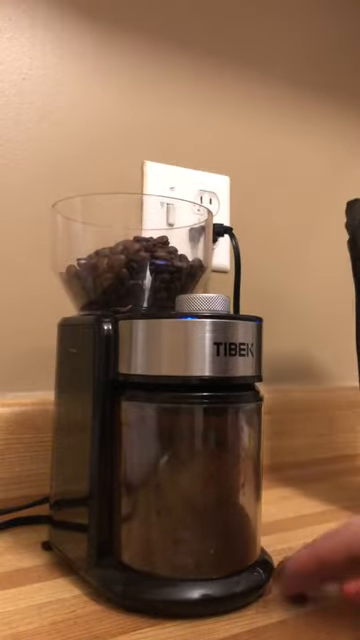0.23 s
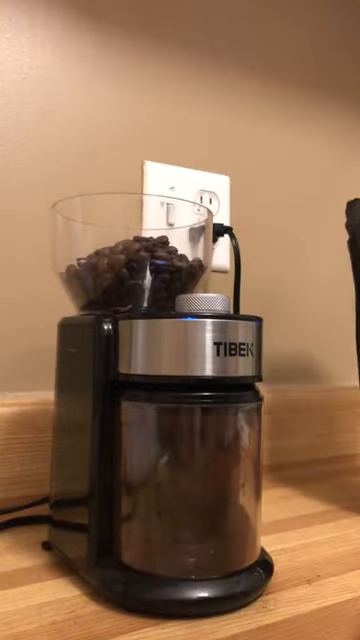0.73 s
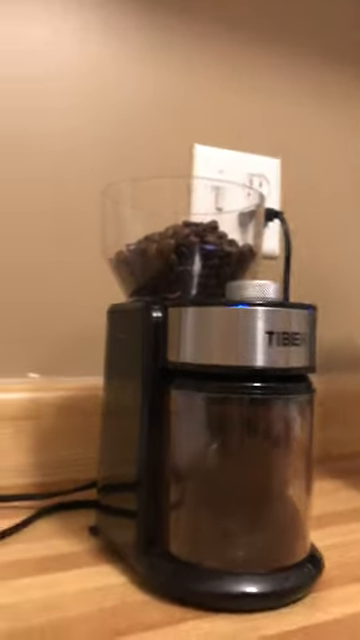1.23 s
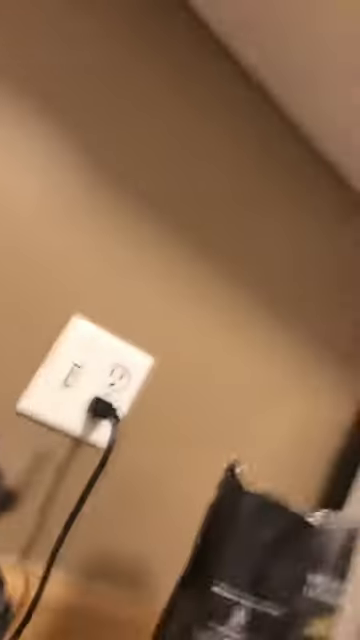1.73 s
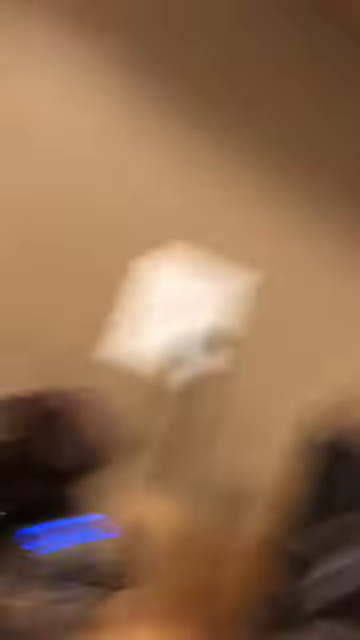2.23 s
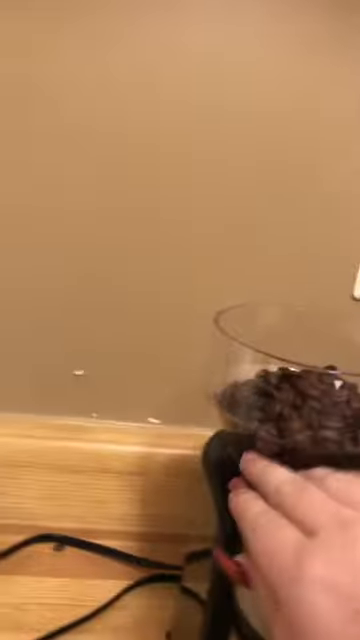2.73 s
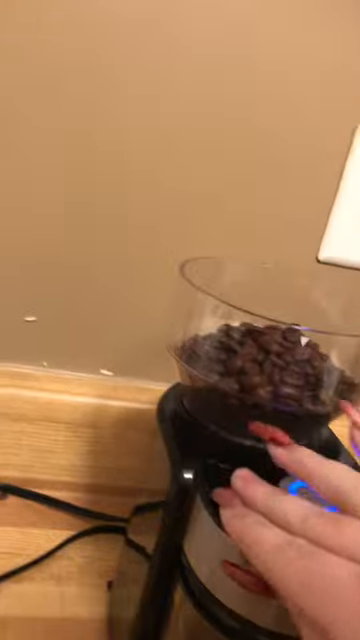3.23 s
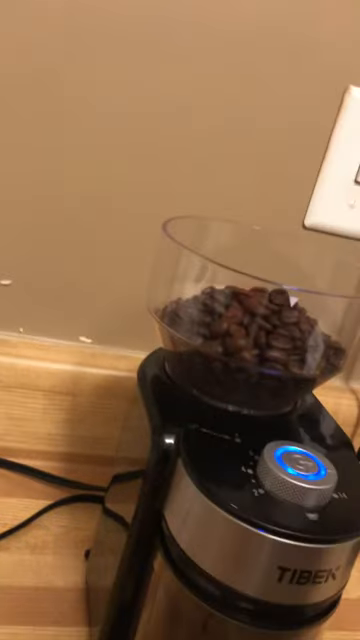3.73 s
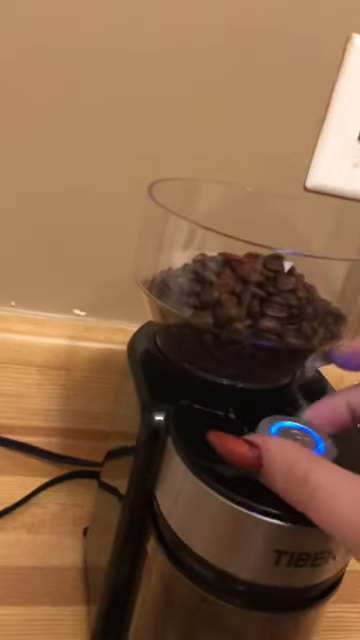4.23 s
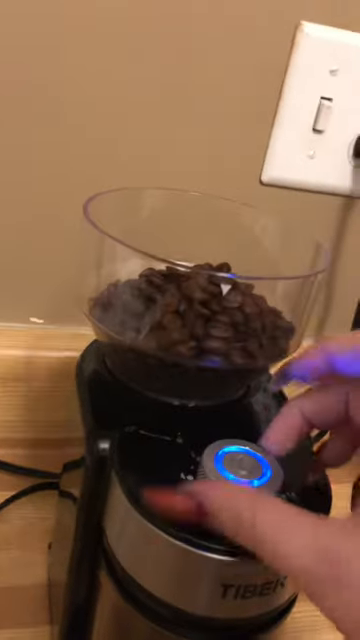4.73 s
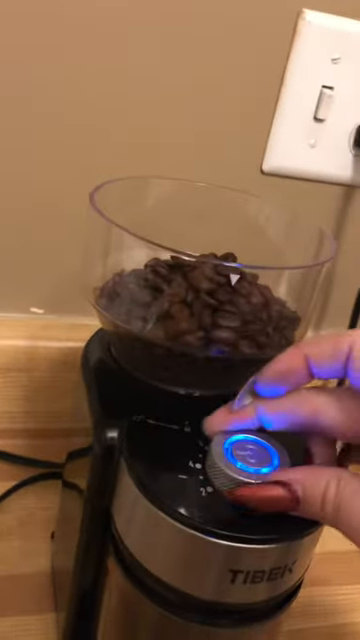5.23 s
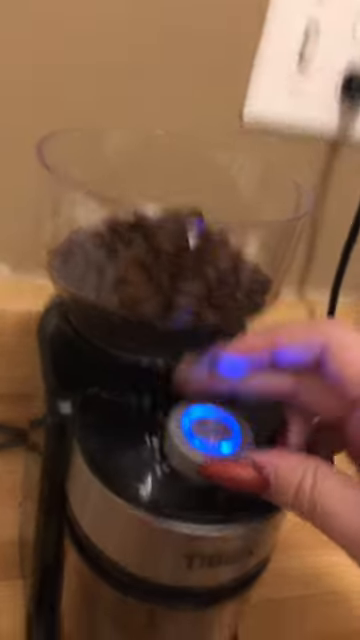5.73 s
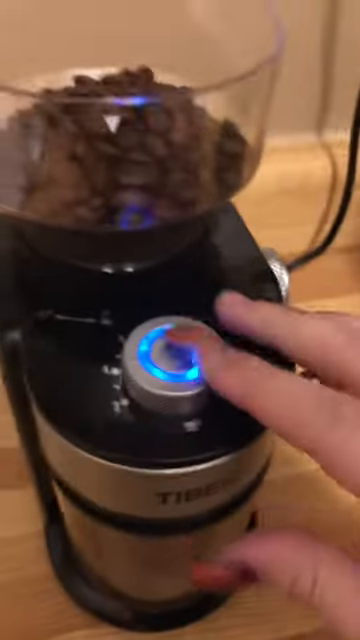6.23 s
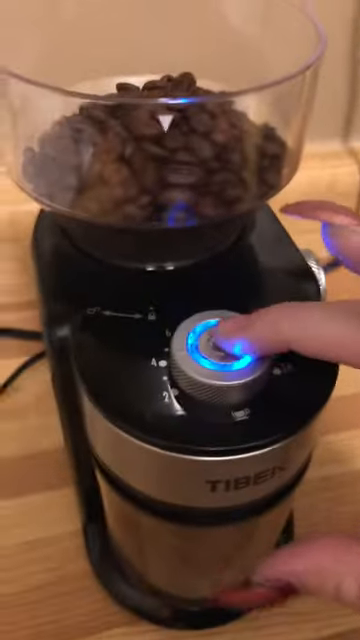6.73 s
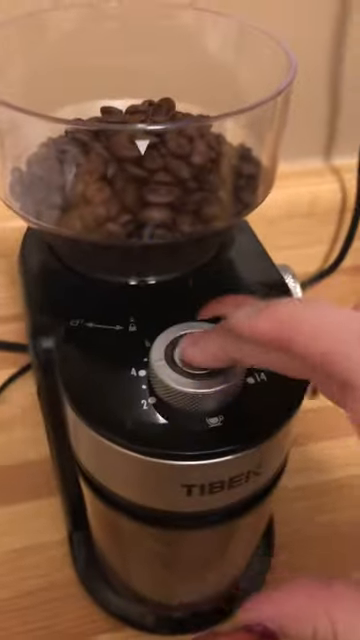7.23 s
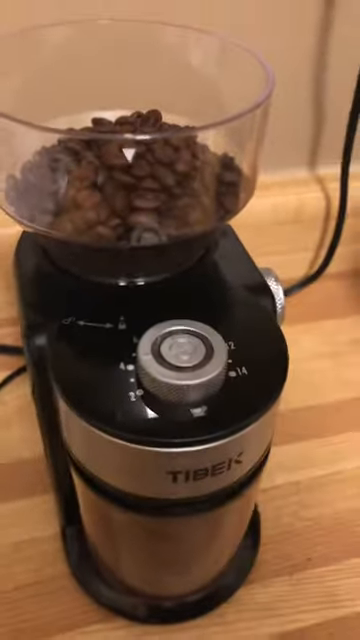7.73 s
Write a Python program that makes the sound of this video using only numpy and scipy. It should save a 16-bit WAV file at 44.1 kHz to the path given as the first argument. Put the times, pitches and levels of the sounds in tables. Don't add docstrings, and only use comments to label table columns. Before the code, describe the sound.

Soft rubbing and handling, sharp nail taps on hard plastic, a knob clicking rapidly forward and back, then more slowly, and finally a firm button press.

```python
import sys
import numpy as np
from scipy import signal
from scipy.fft import rfft, irfft, next_fast_len
from scipy.io import wavfile
from scipy.ndimage import map_coordinates

SR = 44100
rng = np.random.default_rng(int(sys.argv[2]) if len(sys.argv) > 2 else 0)


def convert_level_to_amplitude(level_db):
    exponent = np.asarray(level_db, float) / 20
    return 10 ** exponent


def dump_mix(stems):
    frames = np.atleast_2d(stems).T
    limited = np.clip(frames, -1, 1)
    pcm = np.round(limited * 32767).astype(np.int16)
    wavfile.write(sys.argv[1], SR, pcm)


N = 352359
SIZE = 16384
GRID = np.fft.rfftfreq(SIZE, 1 / SR)


def unit(x):
    return x / np.sqrt(np.mean(x ** 2) + 1e-20)


def along(points, hz):
    f, v = np.transpose(points)
    return np.interp(np.log(hz + 1), np.log(f + 1), v)


def curves(rows):
    time_s, *columns = np.transpose(rows)
    t = np.arange(N) / SR
    return [np.interp(t, time_s, column, -140, -140) for column in columns]


def wobble(rate):
    knots = rng.standard_normal(int(N * rate / SR) + 4)
    return map_coordinates(knots, [np.arange(N) * rate / SR])


def noise(spectrum, grain_db=0):
    raw = rng.standard_normal(N) * convert_level_to_amplitude(grain_db * wobble(400))
    size = next_fast_len(N + 8192)
    gain = convert_level_to_amplitude(along(spectrum, np.fft.rfftfreq(size, 1 / SR)))
    return unit(irfft(rfft(raw, size) * gain, size)[:N])


def ring(start_s, pitch_hz, level_db, t60_s, rise_s):
    t = np.maximum(np.arange(N) / SR - start_s, 0)
    envelope = convert_level_to_amplitude(level_db - 60 * t / t60_s) * (1 - np.exp(-t / rise_s))
    return envelope * np.sin(2 * np.pi * pitch_hz * t)


def resonances(modes):
    power = 0
    for centre, width, db in modes:
        bandpass = (GRID * width) ** 2 / ((centre * centre - GRID ** 2) ** 2 + (GRID * width) ** 2)
        power = power + (convert_level_to_amplitude(db) * bandpass) ** 2
    return np.sqrt(power)


def causal(gain):
    cepstrum = irfft(np.log(gain + 1e-7))
    cepstrum[..., 1:SIZE // 2] *= 2
    cepstrum[..., SIZE // 2 + 1:] = 0
    return np.exp(rfft(cepstrum))


# pitch_hz, t60_s
WALLS = [(500, .3), (2000, 0.27), (5500, 0.2), (15000, 0.17)]


def reverberation(raw):
    hz, frames_s, z = signal.stft(raw, SR, nperseg=256)
    decay = convert_level_to_amplitude(-60 * frames_s / along(WALLS, hz)[:, None])
    return signal.istft(z * decay, SR, nperseg=256)[1][:, :SIZE]


def strikes(times, levels_db, colours, alike, spike_db, hold, t60, ring_db, ring_t60, room_db):
    t = np.arange(SIZE) / SR
    chatter = convert_level_to_amplitude(-60 * np.maximum(t - hold, 0) / t60) + convert_level_to_amplitude(ring_db - 60 * t / ring_t60)
    raw = rng.standard_normal((len(times) + 1, 2, SIZE))
    alike = np.clip(alike, 0, 1)
    raw = alike * raw[:1] + np.sqrt(1 - alike ** 2) * raw[1:]
    blow = raw[:, 0] * chatter + convert_level_to_amplitude(spike_db) * (t == 0)
    walls = reverberation(raw[:, 1]) * (1 - np.exp(-t / 0.003))
    power = 0
    for db, colour in zip(levels_db, colours):
        strength = np.mean(abs(rfft(blow) * colour) ** 2, axis=-1)
        power = power + (convert_level_to_amplitude(2 * db) / strength)[:, None] * colour ** 2
    sound = blow + convert_level_to_amplitude(room_db) * walls
    hits = irfft(rfft(sound) * causal(np.sqrt(power)))
    out = np.zeros(N + SIZE)
    for start_s, hit in zip(times, hits):
        out[round(start_s * SR):][:SIZE] += hit
    return out[:N]


# pitch_hz, level_db (per Hz)
ROOM_TONE = [(59, -31), (100, 2.5), (129, -2.5), (198, -10.5), (368, -3.5), (922, -18.5), (1380, -11.5),
             (2860, -19.5), (4030, -17.5), (15100, -27), (16500, -42.5)]


def kitchen():
    phase = 2 * np.pi * 119.8 * np.arange(N) / SR + 0.5 * wobble(14)
    hum = convert_level_to_amplitude(-67 + 2.5 * wobble(9)) * np.sin(phase)
    return hum + convert_level_to_amplitude(-66.5 + 0.6 * wobble(1.9)) * noise(ROOM_TONE)


# time_s, creak_db, rumble_db
GRIP_LEVELS = [(0.0, -67, -74), (0.38, -62, -70), (0.66, -66.5, -70), (0.87, -67, -68), (0.93, -64, -77),
               (1.0, -59, -66), (1.24, -67, -69), (1.33, -67, -76), (1.51, -66.5, -71), (1.67, -61, -51),
               (1.8, -66, -71), (2.16, -60.5, -65), (2.38, -67, -72), (2.8, -64, -64), (2.87, -69.5, -69),
               (3.22, -69, -74), (3.36, -63, -50.5), (3.49, -61.5, -63.5), (3.63, -64, -70.5),
               (3.76, -67, -66), (4.09, -66, -69), (4.18, -66, -60), (4.25, -63.5, -64), (4.38, -58.5, -54),
               (4.63, -70, -68), (4.72, -76, -52), (4.85, -61, -72.5), (5.05, -57, -69), (5.23, -65, -68),
               (5.5, -63.5, -66), (5.56, -69, -74), (5.96, -68, -67), (6.27, -69.5, -76),
               (6.34, -66.5, -68.5), (6.79, -66.5, -69), (6.87, -63, -59), (7.17, -66.5, -74),
               (7.25, -63.5, -52.5), (7.43, -70, -73), (7.56, -70.5, -75), (7.63, -67, -52),
               (7.79, -63.5, -35.5), (7.99, -69.5, -67)]
# start_s, level_db (peak), pitch_hz, t60_s
CASE_THUMPS = [(0.899, -47, 222, 0.14), (0.98, -41.5, 221, 0.13), (1.031, -48, 142, 0.12),
               (1.129, -38, 172, 0.05), (1.658, -46, 61.4, 0.18), (1.999, -46.5, 214, 0.11),
               (3.322, -45, 128, 0.15), (6.911, -47.5, 287, 0.15), (7.229, -40, 299, 0.13),
               (7.653, -27, 99, 0.14), (7.762, -19.5, 73.6, 0.11)]
# pitch_hz, level_db (per Hz)
CREAK_COLOUR = [(76, -21), (130, 3.5), (335, 1), (518, -3.5), (735, -9.5), (1000, -13), (1300, -41.5),
                (2200, -120)]
RUMBLE_COLOUR = [(13, -43), (22, -8), (43, -1), (59, 2), (86, -9.5), (110, 2), (140, -26.5), (240, -120)]


def grip():
    creak_db, rumble_db = curves(GRIP_LEVELS)
    out = convert_level_to_amplitude(creak_db) * unit(convert_level_to_amplitude(1.5 * wobble(30)) * noise(CREAK_COLOUR))
    out += convert_level_to_amplitude(rumble_db) * unit(convert_level_to_amplitude(wobble(6.2)) * noise(RUMBLE_COLOUR))
    for start_s, level_db, pitch_hz, t60_s in CASE_THUMPS:
        out += ring(start_s, pitch_hz, level_db + 1, t60_s, rise_s=0.0053)
    return out


# time_s, rasp_db, hiss_db, scuff_db
STROKES = [
    [(0.05, -67, -72, -75), (0.116, -59.5, -66, -64), (0.25, -55, -59.5, -65.5), (0.46, -50.5, -53.5, -67),
     (0.49, -58, -64.5, -62), (0.74, -62.5, -71.5, -64), (0.76, -65, -68, -76), (0.814, -68, -79, -67),
     (0.832, -68, -66, -77), (0.85, -67, -76, -65)],
    [(1.05, -69, -75, -62), (1.062, -66, -73, -72), (1.136, -69, -76, -60), (1.174, -62.5, -71, -74),
     (1.29, -83, -87, -71), (1.346, -69, -71, -79), (1.45, -84, -81, -66)],
    [(1.48, -75, -85, -58), (1.516, -75, -92, -62), (1.57, -61, -85, -54.5), (1.678, -69, -73, -65.5),
     (1.786, -73, -94, -61), (1.894, -59.5, -52.5, -71), (1.932, -55.5, -48.5, -66), (2.112, -78, -73, -63),
     (2.162, -53, -55, -54.5), (2.3, -102, -98, -75)],
    [(2.78, -49.5, -63, -67), (2.804, -60, -69, -77), (2.848, -62, -64, -66), (2.924, -64.5, -63, -71),
     (3.154, -71, -70, -90), (3.194, -65.5, -62, -72), (3.29, -87, -67, -86), (3.3, -70, -62, -69)],
    [(4.44, -46, -48, -51), (4.472, -60.5, -65, -55), (4.504, -46, -56.5, -60), (4.56, -85, -73, -69)],
    [(4.64, -77, -80, -82), (4.664, -77, -81, -71), (4.716, -84, -61, -84), (4.76, -84, -89, -82)],
    [(5.92, -92, -79, -84), (5.982, -61.5, -64, -75), (6.078, -68.5, -65, -81), (6.116, -55, -57, -73),
     (6.15, -79, -85, -84)],
    [(6.385, -53, -53, -57), (6.427, -62, -43.5, -78), (6.435, -50, -47, -74), (6.46, -70, -76, -65)],
    [(6.77, -46.5, -62, -70), (6.786, -51, -64, -68), (6.802, -62, -62, -69), (6.82, -75, -92, -72)],
    [(7.45, -86, -79, -78), (7.52, -65.5, -75, -79), (7.642, -63.5, -66.5, -62), (7.73, -59.5, -56, -78),
     (7.75, -53.5, -57.5, -62), (7.814, -82, -91, -59), (7.876, -102, -65, -70), (7.95, -94, -91, -87)],
]
# pitch_hz, level_db (per Hz)
RASP_COLOUR = [(290, -31.5), (500, -9.5), (1340, -2.5), (1610, -1), (2320, -2.5), (2480, -1.5),
               (3060, -0.5), (7000, -11), (9100, -34.5), (15400, -120)]
HISS_COLOUR = [(2350, -43.5), (4000, -7), (4600, -7.5), (6590, -5.5), (10800, -10), (14800, -13),
               (16000, -22.5)]
SCUFF_COLOUR = [(150, -25), (300, 2), (550, 2.5), (1000, -4.5), (1500, -26.5)]


def rubbing():
    rasp = noise(RASP_COLOUR, grain_db=2)
    hiss = noise(HISS_COLOUR, grain_db=2)
    scuff = noise(SCUFF_COLOUR, grain_db=3.5)
    out = np.zeros(N)
    for stroke in STROKES:
        rasp_db, hiss_db, scuff_db = curves(stroke)
        out += convert_level_to_amplitude(rasp_db) * rasp + convert_level_to_amplitude(hiss_db) * hiss + convert_level_to_amplitude(scuff_db - 1) * scuff
    return out


# start_s, pitch_hz, level_db, t60_s, rise_s
STEEL_RINGS = [
    (7.021, 732, -33.5, .19, .005),
    (7.021, 775, -30, .19, .005),
    (7.021, 3774, -40, .07, .001),
    (7.021, 5300, -44, .05, .001),
    (.885, 2585, -54, .13, .03),
    (7.350, 2565, -47, .11, .03),
]


def springs():
    return sum(ring(*row) for row in STEEL_RINGS)


# start_s, level_db (peak), knock_db, body_db, edge_db, pitch_hz (of the spot)
CONTACTS = [(0.2234, -42, -63, -51, -58, 3270), (0.4554, -46, -64, -57, -53, 1660),
            (0.8295, -49, -62, -70, -61, 5170), (0.9866, -45, -46, -45, -67, 3720),
            (1.0014, -48, -63, -56, -70, 2750), (1.6523, -43, -67, -67, -57, 3710),
            (2.169, -31, -53, -56, -75, 3970), (2.591, -12, -60, -40.5, -25, 5200),
            (2.6312, -15.5, -64, -52, -29.5, 5350), (2.7145, -37, -63, -50, -50, 5100),
            (2.7265, -13, -55, -32, -35, 4560), (2.779, -32, -68, -51, -61, 3680),
            (2.8324, -44, -67, -60, -71, 3920), (2.8914, -40, -62, -62, -49, 4800),
            (3.3144, -23, -52, -46, -45, 4570), (3.3216, -25.5, -39, -40.5, -29, 6750),
            (3.4337, -14.5, -38, -30, -15.5, 3950), (3.4521, -24, -37, -33.5, -39, 4700),
            (3.5267, -22.5, -50, -37, -33.5, 4120), (3.5869, -30.5, -54, -42, -34.5, 5100),
            (3.616, -31, -53, -41, -40, 3670), (3.703, -33, -62, -49, -39, 5920),
            (3.715, -21, -40, -32.5, -28, 3590), (3.773, -36, -62, -50, -44, 4340),
            (3.8353, -16.5, -38.5, -35, -31, 3000), (3.9282, -23, -45, -39, -30.5, 5700),
            (3.9614, -32, -48, -46.5, -49, 2930), (3.991, -31, -53, -47, -43.5, 3320),
            (4.0026, -27.5, -48, -42.5, -54.5, 2410), (4.02, -34, -59, -51, -46.5, 3670),
            (4.0788, -30, -52, -46.5, -60.5, 2980), (4.122, -49, -51, -51.5, -47, 4670),
            (4.4346, -20, -35.5, -38, -52.5, 1600), (4.4757, -36.5, -45, -43.5, -54, 3660),
            (4.5051, -27, -41, -44.5, -54.5, 1400), (4.656, -46, -60, -65, -67.5, 4470),
            (4.7142, -53, -62, -58, -55, 1530), (5.654, -39, -64, -48, -68, 2130),
            (5.6694, -33, -56, -43.5, -66, 1620), (5.6939, -42, -52, -53.5, -69, 1400),
            (5.8287, -19.5, -73, -37.5, -31.5, 6630), (6.0845, -39, -69, -68, -58, 4360),
            (6.1105, -39, -71, -57.5, -64, 3980), (6.2677, -22, -49, -38.5, -43, 7000),
            (6.377, -25.5, -52, -41, -42, 3980), (6.4338, -26, -62, -51, -51, 4480),
            (6.569, -36, -60, -47.5, -55.5, 2100), (6.5985, -25, -61, -46, -37, 4200),
            (6.6407, -22.5, -48, -41.5, -37, 2100), (6.7622, -32, -69, -54, -55, 4960),
            (6.7784, -47, -59, -51, -68.5, 2100), (6.8474, -52, -39, -39.5, -66.5, 1470),
            (6.9064, -8, -20.5, -26.5, -32, 1480), (6.9753, -31, -57, -50, -51, 2360),
            (7.0218, -20, -32, -39, -35, 5300), (7.0724, -60.5, -49, -56.5, -75, 2090),
            (7.1804, -62.5, -54, -63, -76.5, 1870), (7.226, -23, -28.5, -33.5, -29.5, 1560),
            (7.2391, -30, -32, -30, -55, 1860), (7.2973, -36.5, -59, -66, -65, 1900),
            (4.182, -38.5, -73, -46, -67.5, 2230)]
# pitch_hz, width_hz, level_db
SHELL_MODES = [
    [(400, 300, 0), (730, 290, 6)],
    [(1457, 770, 3), (2100, 270, 5), (3240, 700, -1)],
    [(3700, 980, 1.5), (5100, 590, 6), (7340, 1620, 1.5)],
    [(8780, 1900, 4.5), (12000, 1300, 4.5), (14260, 4900, 0.5)],
]


def taps():
    start_s, peak_db, knock_db, body_db, edge_db, spot_hz = np.transpose(CONTACTS)
    middle_db = peak_db + 7.5
    spot_db = np.where(spot_hz < 3500, body_db + 22.5, middle_db)
    levels = [knock_db + 15.5, body_db + 18.5, middle_db, edge_db + 19, spot_db]
    colours = [resonances(modes) for modes in SHELL_MODES]
    spot = spot_hz[:, None]
    colours.append(resonances([(spot, 0.32 * spot, 0)]))
    return strikes(start_s, levels, colours, alike=0, spike_db=10, hold=0.0006, t60=0.01,
                   ring_db=-8, ring_t60=0.074, room_db=-17)


# start_s, level_db (peak)
FORWARD_TURN = [(4.206, -2), (4.2248, -2.5), (4.2415, -5.5), (4.257, -3), (4.2758, -5), (4.2947, -2),
                (4.3109, -1.5), (4.3238, -1), (4.335, 0), (4.346, 1.5), (4.3572, -3.5), (4.368, -1.5),
                (4.3857, -2.5)]
BACK_TURN = [(4.8347, -0.5), (4.8587, -1.5), (4.8835, -1), (4.9063, 0), (4.9252, -1.5), (4.9428, -0.5),
             (4.958, -6), (4.9734, -2.5), (4.9931, -2.5), (5.013, -5.5), (5.0328, -4), (5.0539, -2)]
SLOW_TURN = [(5.0767, 0.5), (5.1023, -2), (5.1349, -0.5), (5.1642, -0.5), (5.2003, -1), (5.3118, 0),
             (5.4017, 1.5), (5.456, 0.5)]
# pitch_hz, level_db (per Hz)
PAWL_COLOURS = [
    [(530, -64), (900, -34), (1460, -13.5), (1790, -21), (2330, -9), (3640, -12.5), (4050, -17), (4570, -3),
     (5410, -1), (6330, -10), (7400, 0), (9090, -8.5), (12900, -2.5), (16000, -5)],
    [(530, -67), (900, -38), (1360, -12), (1720, -12), (2270, -9), (3770, -22.5), (5040, -7), (6250, -10.5),
     (7680, -5), (8870, -11), (9650, 1), (10500, -6), (15200, -4.5), (16000, -8.5)],
    [(530, -62), (900, -32), (1570, -17.5), (1720, -22), (2170, -17.5), (4050, -20.5), (4680, -10.5),
     (5610, -6), (6560, -17), (8150, -1), (11100, -17), (12300, -4), (13200, -4), (16000, -5)],
]


def knob():
    out = np.zeros(N)
    for teeth, colour in zip((FORWARD_TURN, BACK_TURN, SLOW_TURN), PAWL_COLOURS):
        start_s, peak_db = np.transpose(teeth)
        out += strikes(start_s, [peak_db + 9.5], [convert_level_to_amplitude(along(colour, GRID))], alike=0.76, spike_db=11.5,
                       hold=0.00077, t60=0.014, ring_db=-11, ring_t60=0.027, room_db=-14.5)
    return out


def scene():
    return (kitchen() + grip() + rubbing() + springs() + taps() + knob())[None]


def roll_off(x):
    return signal.sosfilt(signal.butter(12, 17140, fs=SR, output="sos"), x)


# pitch_hz, level_db
MICROPHONE = [(20, -25), (40, 0), (15700, 0), (16000, -8), (16600, -12), (16900, -50)]


def record(dry):
    top = 0.87
    soft = dry / (1 + abs(dry / top) ** 4) ** (1 / 4)
    gain = convert_level_to_amplitude(along(MICROPHONE, np.fft.rfftfreq(N + SIZE, 1 / SR)))
    mix = irfft(rfft(soft, N + SIZE) * gain, N + SIZE)[:, :N]
    return roll_off(mix)


dry = scene()
out = record(dry)
dump_mix(out)
```